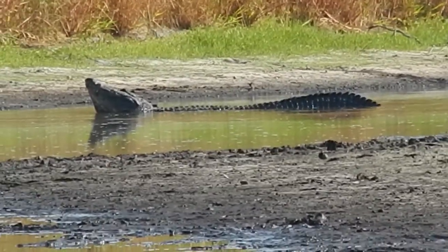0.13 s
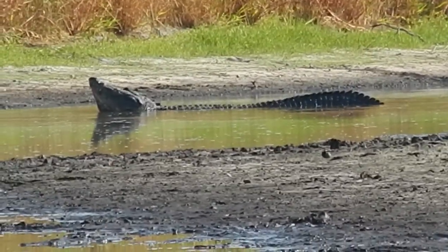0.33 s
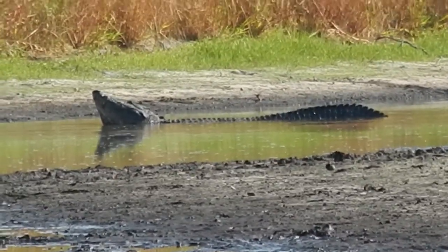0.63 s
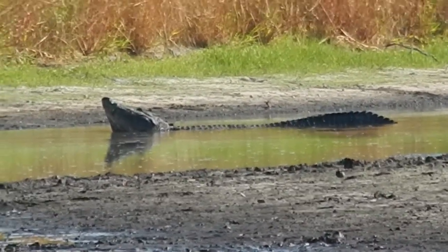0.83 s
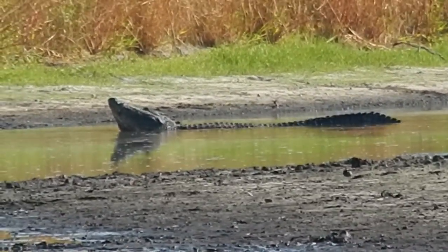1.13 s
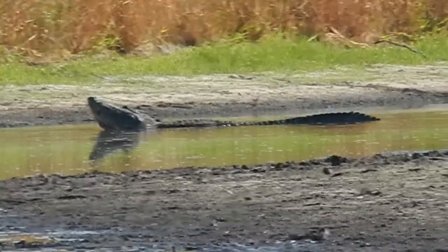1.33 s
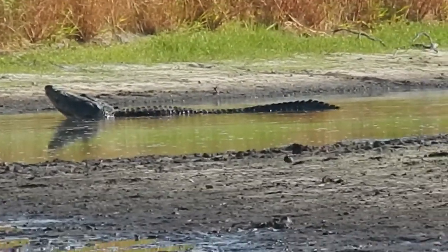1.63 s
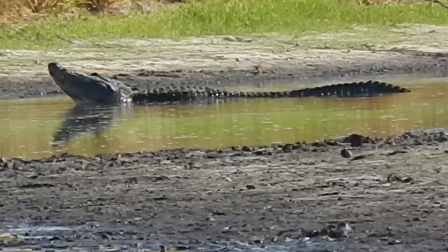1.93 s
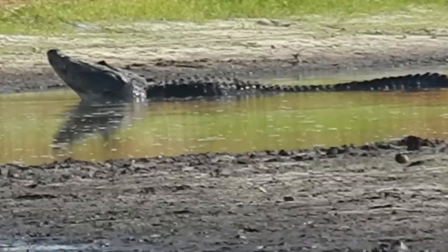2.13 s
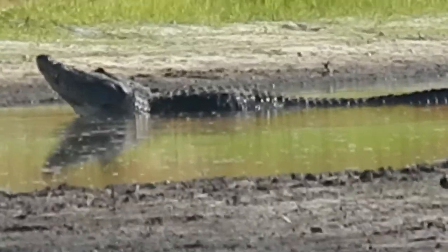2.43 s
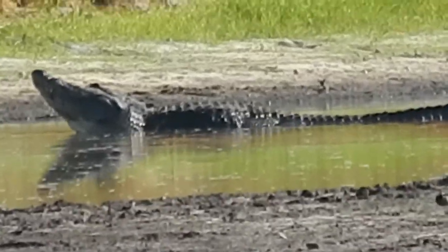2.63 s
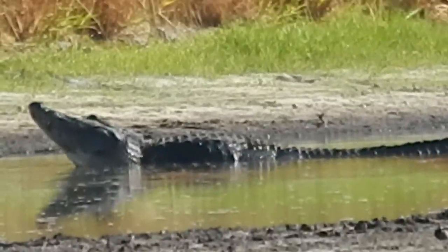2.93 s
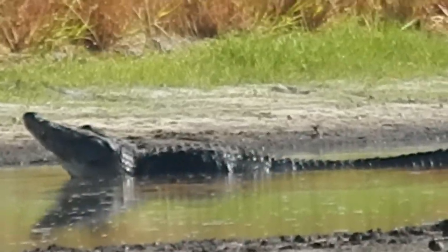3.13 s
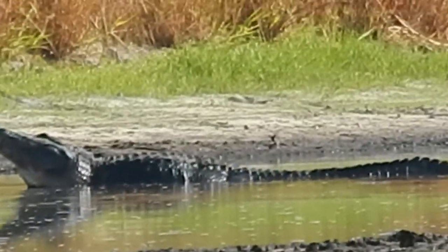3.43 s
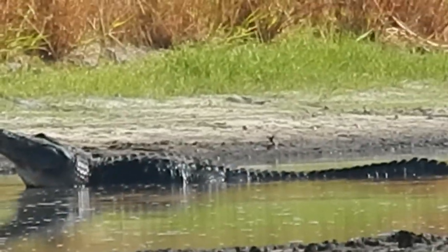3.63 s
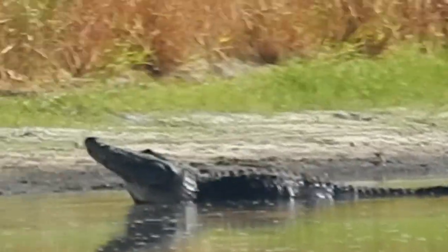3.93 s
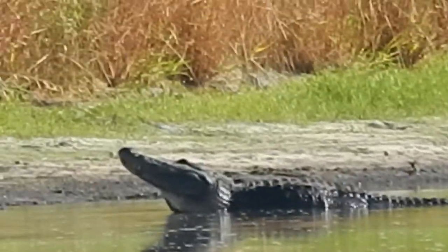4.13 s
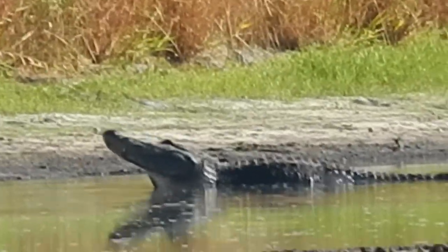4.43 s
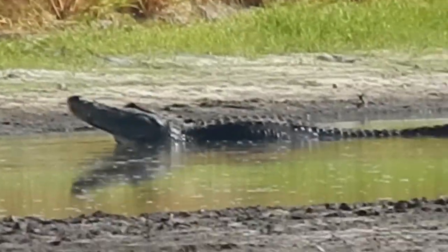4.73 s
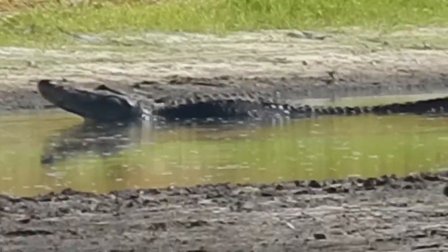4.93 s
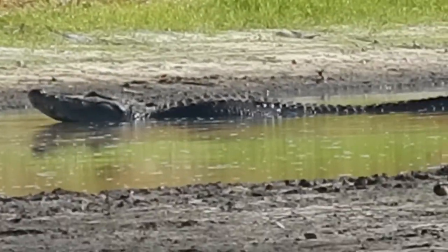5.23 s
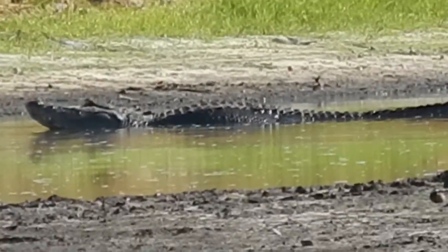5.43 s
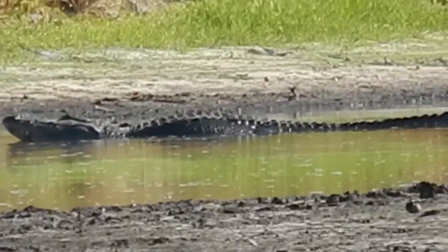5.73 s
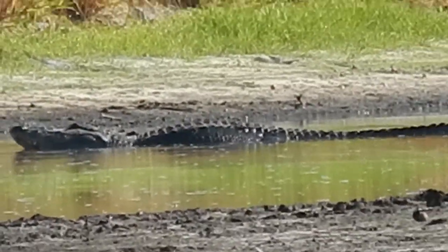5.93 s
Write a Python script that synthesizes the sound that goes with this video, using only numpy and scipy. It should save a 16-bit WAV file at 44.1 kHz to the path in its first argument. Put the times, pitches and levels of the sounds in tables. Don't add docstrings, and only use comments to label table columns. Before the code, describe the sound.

A distant alligator's deep bellow is already under way at 0 s, about thirty slow throat pulses per second, chesty and rough, pushing again near 0.9 s and dying by 1.5 s. Faint after-growls tick on until about 3.5 s. Wind rumble and soft handling jolts cover the first 1.5 s, then calm. From 1.4 to 1.8 s a marsh bird gives seven rapid hoarse chucks. At 2.2 s a sharp, dry button click snaps close, towards the right, by far the loudest event. Soft whistles follow at 2.3-2.6 s, then scattered chucks, with short sliding whistles around 3.3, 3.5, 4.2 and 4.35 s. Buzzy notes come at 5.05-5.2 s, more chucks after, and a longer buzz at 5.9 s. Faint lens whirr from 2 to 3.9 s, small casing creaks, focus ticks, thin crickets and steady air persist quietly; a low far engine hums after 4.8 s.

```python
import sys
import numpy as np
from scipy import signal
from scipy.fft import rfft, irfft, next_fast_len
from scipy.io import wavfile
from scipy.ndimage import uniform_filter1d

SR = 44100
rng = np.random.default_rng(int(sys.argv[2]) if len(sys.argv) > 2 else 0)


def natural_amplitude(level_db):
    exponent = np.asarray(level_db, float) / 20
    return 10 ** exponent


def wav_out(sig):
    wavfile.write(sys.argv[1], SR, np.round(np.clip(np.atleast_2d(sig).T, -1, 1) * 32767).astype(np.int16))


N = 267598

# (time [s], level [dB])
EFFORT = [
    (0.0, -38),
    (0.34, -38.5),
    (0.5, -41),
    (0.9, -37.5),
    (1.18, -43.5),
    (1.27, -43.5),
    (1.5, -71),
]
# (frequency [Hz], width [Hz], level [dB])
CHEST = [(88.3, 69.6, -4), (118, 50.6, 3), (165.3, 51.2, 1), (275.2, 81.8, -5.5), (311.3, 129, -12)]
# (time [s], length [s], level [dB])
GROWLS = [
    (1.6, .38, -49.5),
    (2.003, 0.177, -54),
    (2.361, 0.623, -51),
    (2.995, .5, -50.5),
]
PULSES_PER_S, SLOWING_PER_S2, FIRST_TURN = 33.5, 10.3, -.8
BELLOW_END_S, AFTER_PER_S = 1.4, 31.5
STRONG_WEAK_DB, BREATH = -2.5, 8.5
GROWL_FADE_DB = 6

CRICKETS_DB = -67.5

# (frequency [Hz], density [dB per Hz])
AIR = [(35, -49), (60, 3), (98, -4), (227, -12.5), (621, -21.5), (1090, -20.5), (2470, -29), (4640, -32.5),
       (6300, -36.5), (8920, -34.5), (11500, -37), (14200, -39), (16000, -45)]
# (frequency [Hz], correlation [-1 to 1])
LIKENESS = [(60, 1), (150, 0.882), (380, 0.458), (950, 0.312), (2380, 0.168), (5980, -0.77), (15000, -0.18)]
AIR_DB, BREEZE_DB = -49.5, .6
# (frequency [Hz], density [dB per Hz])
RUMBLE_COLOUR = [(12, -25.5), (25, 3.5), (45, 2.5), (65, -2), (100, -4), (150, -6), (210, -29),
                 (400, -67.5)]
# (time of peak [s], level [dB], time to rise 10 dB [s], time to fall 10 dB [s])
GUSTS = [
    (.16, -35, 0.39, 0.0639),
    (.55, -35, 0.09, 0.1765),
    (1.0, -36.5, 0.09, 0.13),
    (2.05, -41.5, 0.43, 0.1031),
    (2.53, -48.5, 0.57, 0.04),
    (2.95, -48.5, 0.22, 0.87),
    (4.05, -49, .5, .5),
    (5.22, -50, 0.52, 0.01),
    (5.64, -49, .1, 0.53),
]
CALM_DB, CALMING_DB_PER_S = -48, 2.5

# (time [s], peak level [dB], frequency [Hz], 60 dB decay [s])
THUMPS = [
    (0.124, -28.5, 37.7, 0.028),
    (0.527, -32.5, 52.7, 0.15),
    (0.982, -34.5, 42.4, 0.075),
    (1.424, -38, 64, 0.056),
]
# (time [s], peak level [dB], left over right [dB])
CREAKS = [
    (0.4482, -35, -13.5),
    (0.9799, -42.5, -12),
    (1.7515, -41.5, 11.5),
    (2.1921, -33.5, -8),
    (3.955, -42.5, -19),
    (4.9248, -42.5, 1.5),
    (4.97, -53.5, 7),
    (5.2634, -40.5, -8.5),
    (5.315, -43, -8),
    (5.7275, -43.5, -22),
]
CREAK_HZ = 3390
# (time [s], peak level [dB])
FOCUS = [(0.4484, -60), (1.1633, -46.5), (1.7519, -46.5), (2.0183, -45.5), (2.2209, -57.5), (2.5361, -40),
         (2.8664, -56), (3.0884, -54.5), (3.7798, -55), (4.1121, -44), (4.3685, -39.5), (5.2126, -43.5),
         (5.5507, -41.5), (5.886, -45)]

# (time [s], length [s], frequency [Hz], level [dB])
FAR_NOTES = [(.622, .025, 1050, -55), (.675, .025, 1150, -56), (.76, .03, 3900, -61), (.975, .02, 500, -53),
             (1.22, .03, 3900, -61), (1.35, .035, 3900, -60), (3.955, .07, 1850, -57),
             (3.965, .025, 430, -47), (4.0, .06, 2550, -60), (4.03, .03, 830, -56), (4.04, .05, 1950, -55),
             (4.26, .08, 1830, -58), (4.27, .05, 3060, -58), (5.06, .03, 3500, -57)]
# (time [s], peak level [dB], length [s], top above 7 kHz [dB])
CHUCKS = [(1.431, -44.5, 0.022, -3.5), (1.488, -39.5, 0.0275, -10), (1.543, -41, 0.0292, -8.5),
          (1.596, -38, 0.0265, -10.5), (1.648, -39.5, 0.0274, -8), (1.703, -41, 0.0198, -12.5),
          (1.759, -43, 0.0173, -16.5), (2.664, -40, 0.0318, -12), (3.21, -48.5, 0.0207, -28),
          (3.256, -38, 0.0325, -18), (3.306, -46, 0.04, -20), (3.608, -41.5, 0.0318, -23),
          (3.682, -47, 0.019, -9), (4.096, -45.5, 0.0143, -24), (4.142, -38, 0.0338, -16),
          (4.19, -46, 0.0484, -7), (4.471, -38.5, 0.0318, -16), (4.517, -50, 0.0346, -21.5),
          (4.953, -45, 0.0119, 0), (5.0, -37, 0.0267, -15), (5.251, -39, 0.0346, -12),
          (5.307, -40.5, 0.028, -6.5), (5.361, -41.5, 0.0283, -27), (5.478, -47, 0.0176, -18.5),
          (5.776, -50.5, 0.0225, -24), (5.837, -40, 0.0307, -16.5), (6.037, -39.5, 0.0377, -15)]
# (frequency [Hz], width [Hz], level [dB])
CHUCK_THROAT = [(1011, 263, -0.5), (1285.7, 158, 5), (1551, 41.4, 3.5), (1914, 133.7, 2), (2674, 310, -6.5),
                (4000, 340, -6.5)]
# (frequency [Hz], width [Hz], level [dB])
CHUCK_TOP = [(8300, 1400, 0), (9600, 1400, -1), (10900, 1300, -3)]
CHUCK_BEAK_HZ, CHUCK_BEAK_SPREAD = 1220, .08
LEFT_LAG = 4
MARSH_DB = -13

# (time [s], length [s], level [dB])
LENS_RUNS = [
    (2.036, .17, -66.5),
    (2.3, 1.58, -63.5),
]
# (frequency [Hz], width [Hz], level [dB])
LENS_BODY = [(11300, 1000, 0), (12200, 700, -5), (13300, 900, -3), (14300, 1100, -3), (15300, 1000, -4)]
LENS_STEPS_PER_S, LENS_SLOWING_PER_S2 = 58.9, 1.6
# (time [s], left level [dB], right level [dB], sharpness [Hz])
BUTTON = [
    (2.2211, -11, -7.5, 1800),
    (2.2229, -13.5, -4.5, 12000),
    (2.2236, -17, -14, 4500),
    (2.2249, -21, -43, 2500),
    (2.2258, -24, -9, 1500),
    (2.234, -57.5, -57.5, 2000),
]
# (frequency [Hz], level [dB], 60 dB decay [s])
CASING = [
    [(146.5, -13, 0.024), (800, -22.5, 0.0025), (1300, -2, 0.0154), (1559, 3.5, 0.0081), (1940, -9, 0.0101),
     (2796, 0, 0.0096), (5060, -7, 0.0072), (6950, -11.5, 0.0026), (12090, -14.5, 0.0089)],
    [(140, -17.5, 0.0197), (783, -12, 0.00303), (1565, -12.5, 0.0135), (2000, -16.5, 0.0156),
     (2619, 0, 0.01025), (3366, -7.5, 0.00644), (4640, -12, 0.00645), (7775, -12.5, 0.00337),
     (11330, -7.5, 0.0032)],
]

# (time [s], length [s], first pitch [Hz], last pitch [Hz], level [dB])
SOFT_NOTES = [
    (2.282, 0.0425, 1159, 1213, -48.5),
    (2.347, 0.0682, 1212, 1214, -47.5),
    (2.41, 0.1342, 1112, 1097, -42),
    (2.57, .05, 1077, 1039, -42),
]
# (time [s], length [s], first pitch [Hz], last pitch [Hz], level [dB])
HIGH_NOTES = [
    (3.31, .195, 1283, 1184, -46),
    (4.195, 0.1582, 1251, 1174, -46.5),
]
# (time [s], length [s], first pitch [Hz], last pitch [Hz], level [dB])
LOW_NOTES = [
    (3.502, 0.0588, 1110, 1057, -39),
    (4.351, 0.0562, 1093, 1053, -38.5),
]
# (frequency [Hz], level [dB])
WHISTLE_THROAT = [(1150, 0.5), (2300, -11.5), (3300, -10), (3750, -2), (4400, -19.5), (6200, -8),
                  (7600, -22), (10300, -22.5)]
# (frequency [Hz], width [Hz], level [dB])
NOTCHES = [(1233.5, 12.1, -7), (2475.7, 33, -17.5)]
WAVER_DB = 1.3

# (time [s], length [s], level [dB], beak resonance [Hz], hoarseness [0-1])
UNDER_NOTES = [
    (2.46, .09, -45, 1820, 0.41),
    (2.575, 0.0777, -45, 1856, 0.32),
    (3.53, .07, -45, 1364, 0.56),
    (4.39, 0.0689, -43.5, 1420, 0.49),
]
# (time [s], length [s], level [dB], beak resonance reached [Hz], hoarseness [0-1])
BUZZ_NOTES = [
    (5.05, .082, -41, 1320, .2),
    (5.144, .048, -42.5, 1300, 0.32),
    (5.201, .029, -43, 1290, 0.27),
]
# (time [s], length [s], level [dB], beak resonance reached [Hz], hoarseness [0-1])
LONG_BUZZ = [
    (5.89, .152, -44, 1225, .11),
]
# (frequency [Hz], level [dB])
BUZZ_THROAT = [(600, -51), (900, -10), (1300, -11), (2000, -9), (2400, -14.5), (3700, -10), (5000, -12),
               (7000, -19), (9000, -22), (11500, -31)]
BEAT_HZ, LONG_BEAT_HZ, BEAT_SAG_HZ_PER_S = 185, 189, 230
BEAK_SHUT_HZ, BEAK_WIDTH_HZ = 1145, 150

# (time [s], firing rate [Hz], level [dB])
DRONE = [(4.8, 76.78, -55), (5.106, 77, -45), (5.162, 84.6, -45.5), (5.342, 83.7, -43), (5.374, 84.14, -60),
         (5.4, 86.25, -45.5), (5.8, 87.03, -49.5), (6.068, 88.17, -52.5)]


def in_time(rows, fade=0.0013):
    t = np.arange(N) / SR
    s, *columns = np.transpose(rows)
    gate = np.clip(np.minimum(t - s[0], s[-1] - t) / fade, 0, 1)
    return [np.interp(t, s, c) for c in columns] + [gate]


def held(s, length, attack_s, release_s):
    t = np.arange(N) / SR - s
    return np.clip(np.minimum(t / attack_s, (length - t) / release_s), 0, 1)


def rms_one(x):
    return x / np.sqrt(np.mean(x ** 2) + 1e-20)


def at_hz(points, hz):
    known_hz, value = np.transpose(points)
    return np.interp(np.log(hz + 1e-9), np.log(known_hz + 1e-9), value)


def drift(hz):
    lowpass = signal.butter(2, hz * 20, fs=SR, output="sos")
    slow = signal.sosfilt(lowpass, rng.standard_normal(N // 20 + 4002))[4000:]
    return np.interp(np.arange(N) / 20, np.arange(len(slow)), rms_one(slow))


def resonate(x, modes):
    out = 0
    for k, (hz, width_hz, db) in enumerate(modes):
        r = np.exp(-np.pi * width_hz / SR)
        zeros = np.array([1, 0, -1]) * (1 - r * r) / 2
        poles = [1, -2 * r * np.cos(2 * np.pi * hz / SR), r * r]
        out = out + (-1) ** k * natural_amplitude(db) * signal.lfilter(zeros, poles, x + 1e-18)
    return out


def beats(turns):
    return np.diff(np.floor(turns), prepend=np.floor(turns[0]))


def placed(x, pan_db):
    return np.array([np.roll(x, LEFT_LAG) * natural_amplitude(pan_db / 2), x * natural_amplitude(-pan_db / 2)])


def stereo_noise(spectrum, likeness):
    size = next_fast_len(N)
    hz = np.fft.rfftfreq(size, 1 / SR)
    shared, left, right = rfft(rng.standard_normal((3, size))) * natural_amplitude(at_hz(spectrum, hz))
    alike = np.clip(likeness(hz), 0, 1)
    late = np.exp(-2j * np.pi * hz * LEFT_LAG / SR)
    common = np.sqrt(alike) * shared * np.array([late, late ** 0])
    pair = common + np.sqrt(1 - alike) * np.array([left, right])
    return rms_one(irfft(pair, size)[:, :N])


def bellow():
    t = np.arange(N) / SR
    per_s = np.where(t < BELLOW_END_S, PULSES_PER_S - SLOWING_PER_S2 * t, AFTER_PER_S)
    turns = FIRST_TURN + np.cumsum(per_s) / SR
    clicks = beats(np.maximum.accumulate(turns + 0.0372 * drift(30.57)))
    at = np.flatnonzero(clicks)
    clicks[at] = natural_amplitude(STRONG_WEAK_DB * (-1) ** np.arange(len(at)) + 1.95 * rng.standard_normal(len(at)))
    airflow = uniform_filter1d(clicks, size=700, origin=300) + 0.00058
    breath = airflow * rng.standard_normal(N) * BREATH
    dull = signal.butter(3, 350, fs=SR, output="sos")
    voice = signal.sosfilt(dull, resonate(clicks + breath, CHEST))
    evened = voice / np.sqrt(uniform_filter1d(voice ** 2, size=9000) + 1e-12)
    db, gate = in_time(EFFORT)
    after = sum(natural_amplitude(db - GROWL_FADE_DB * (t - s) / length) * held(s, length, .04, 0.089)
                for s, length, db in GROWLS)
    return evened * natural_amplitude(-3.5) * (natural_amplitude(db) * gate + after)


def crickets():
    out = 0
    for hz, pan_db, level_db in ((5676, 14, -1.5), (5425, -20.5, -11)):
        stroke = np.sin(2 * np.pi * np.cumsum(78 * (1 + 0.02086 * drift(3.01))) / SR)
        pulse = 0.575 + np.maximum(stroke, 0) ** 2
        wing = [(hz, 360, 0)]
        trill = rms_one(resonate(resonate(pulse * rng.standard_normal(N), wing), wing))
        out = out + placed(trill * natural_amplitude(level_db + 2.74 * drift(3.2)), pan_db)
    return out * natural_amplitude(CRICKETS_DB)


def air():
    level = natural_amplitude(AIR_DB + 0.5 + BREEZE_DB * drift(1.22))
    return level * stereo_noise(AIR, lambda hz: at_hz(LIKENESS, hz)) * natural_amplitude([[.7], [-.7]])


def wind():
    t = np.arange(N) / SR
    gusts = sum(natural_amplitude(db - 10 * np.maximum((s - t) / rise, (t - s) / fall)) for s, db, rise, fall in GUSTS)
    level = (gusts + natural_amplitude(CALM_DB - CALMING_DB_PER_S * t)) * natural_amplitude(-4 + 2.22 * drift(6.78))
    return level * stereo_noise(RUMBLE_COLOUR, lambda hz: hz / 110) * natural_amplitude([[2.5], [-2.5]])


def thumps():
    t = np.arange(N) / SR
    return sum(natural_amplitude(db - 60 * np.abs(t - s - .025) / t60) * np.sin(2 * np.pi * hz * (t - s))
               for s, db, hz, t60 in THUMPS)


def creaks():
    out, size = np.zeros((2, N)), 400
    band = signal.butter(1, [CREAK_HZ / 5, CREAK_HZ * 2], "band", fs=SR, output="sos")
    for s, db, pan_db in CREAKS:
        burst = rng.standard_normal(size) * np.exp(-np.arange(size) / SR / 0.00605)
        burst = signal.sosfilt(band, burst)
        i = round(s * SR)
        out[:, i:i + size] += burst * natural_amplitude(db - 8 + pan_db * np.array([[.5], [-.5]]))
    return out


def focus():
    t = np.arange(N) / SR
    shape = sum(natural_amplitude(db - 15) * np.exp(-((t - s - .01) / 0.0041) ** 2) for s, db in FOCUS)
    return shape * rms_one(resonate(rng.standard_normal((2, N)), [(13930, 530, 0)]))


def far_notes():
    t, shimmer = np.arange(N) / SR, 1 + 0.85 * drift(260)
    tones = 0
    for s, length, hz, db in FAR_NOTES:
        swell = np.sin(np.pi * np.clip((t - s) / length, 0, 1))
        tones = tones + natural_amplitude(db) * swell * np.sin(2 * np.pi * hz * t)
    return shimmer * tones


def chucks():
    size = 2000
    chance = rng.standard_normal((len(CHUCKS), 3, size))
    out, t = np.zeros(N + size), np.arange(size) / SR
    for (s, db, length, top_db), (wobble, breath, hiss) in zip(CHUCKS, chance):
        beak_hz = CHUCK_BEAK_HZ * np.exp(CHUCK_BEAK_SPREAD * wobble[1])
        shape = np.clip(np.minimum(t / 0.00049, (length - t) / 0.01357), 0, 1)
        beat_hz = 265 * (1 + .03 * wobble[0] + 0.627 * uniform_filter1d(wobble, size=200))
        source = 7.04 * beats(0.704 + np.cumsum(beat_hz) / SR) + 0.373 * breath
        voiced = resonate(source, CHUCK_THROAT) + resonate(source, [(beak_hz, 150, 3)])
        top = rms_one(resonate(hiss, CHUCK_TOP)) * natural_amplitude(db + top_db - 10.5)
        i = round(s * SR)
        out[i:i + size] += shape * (rms_one(voiced) * natural_amplitude(db - 8.5) + top)
    return out[:N]


def marsh(x):
    t = np.arange(5000) / SR
    scatter = rng.standard_normal((2, 5000)) * natural_amplitude(-60 * t / .15) * (t > .004)
    scatter = scatter / np.sqrt((scatter ** 2).sum(1, keepdims=True))
    dulled = signal.lfilter([.5], [1, -.5], x)
    return natural_amplitude(MARSH_DB) * signal.fftconvolve(dulled[None], scatter)[:, :N]


def lens():
    per_s = LENS_STEPS_PER_S - LENS_SLOWING_PER_S2 * np.arange(N) / SR
    puffs = signal.lfilter([1], [1, -.985], beats(np.cumsum(per_s) / SR)) + 0.204
    pair = resonate(puffs * rng.standard_normal((2, N)), LENS_BODY)
    runs = sum(natural_amplitude(db) * held(s, length, 0.072, .018) for s, length, db in LENS_RUNS)
    return rms_one(pair) * natural_amplitude(0.99 * drift(3.3)) * runs


def button():
    start, size = round(BUTTON[0][0] * SR), 3000
    out, clicks = np.zeros((2, N)), np.zeros((2, size))
    for n, (s, left_db, right_db, hz) in enumerate(BUTTON):
        soft = np.exp(-2 * np.pi * hz / SR)
        contact = (1 - soft) * soft ** np.arange(60)
        i = max(round(s * SR) - start, 0)
        clicks[:, i:i + 60] += (-1) ** n * natural_amplitude([[left_db], [right_db]]) * contact
    for port, modes in enumerate(CASING):
        for k, (hz, db, t60) in enumerate(modes):
            r, w = natural_amplitude(-60 / (t60 * SR)), 2 * np.pi * hz / SR
            ring = signal.lfilter([0, np.sin(w)], [1, -2 * r * np.cos(w), r * r], clicks[port])
            out[port, start:start + size] += (-1) ** k * natural_amplitude(db) * ring
    return out


def whistles(notes, bend, fade_db_per_s, dull_db):
    out, quaver = np.zeros(N), 1 + 0.00384 * drift(62)
    shimmer, k = drift(43), np.arange(1, 9)[:, None]
    for s, length, first_hz, last_hz, db in notes:
        gate = held(s, length, 0.00553, 0.0047)
        span = np.flatnonzero(gate)
        t = np.arange(len(span)) / SR
        hz = first_hz + (last_hz - first_hz) * (t / length) ** bend
        notch = sum(dip_db * np.exp(-((k * hz - at) / width) ** 2) for at, width, dip_db in NOTCHES)
        waver = WAVER_DB * np.sqrt(k * k - .5) ** 0.643 * shimmer[span - 5000 * k]
        dulling = dull_db * (k > 2) * np.where(k * hz > 8200, .3, 1)
        levels = db - fade_db_per_s * t + at_hz(WHISTLE_THROAT, k * hz) + notch - dulling + waver
        phase = 2 * np.pi * np.cumsum(hz * quaver[span]) / SR
        partials = natural_amplitude(levels) * np.sin(k * phase + k * k)
        out[span] += gate[span] * np.sqrt(2) * partials.sum(0)
    return out


def buzz_course(notes, beat_hz, peak_at, swell_db, fade_db, roughening, opens):
    courses = []
    for s, length, db, hz, hoarse in notes:
        first_hz = BEAK_SHUT_HZ if opens else hz
        sagged_hz = beat_hz - BEAT_SAG_HZ_PER_S * .28 * length
        courses.append([
            (s, beat_hz, db - swell_db, first_hz, hoarse),
            (s + peak_at * length, beat_hz, db, first_hz, hoarse),
            (s + .6 * length, beat_hz, db - fade_db / 3, hz, hoarse + roughening / 8),
            (s + .72 * length, beat_hz, db - fade_db / 3, hz * 1.04, hoarse + roughening),
            (s + length, sagged_hz, db - fade_db, hz, hoarse + roughening)])
    return courses


def buzzes(courses, beak_db, width_hz):
    out = np.zeros(N)
    for rows in courses:
        *columns, gate = in_time(rows, fade=0.0015)
        span = gate > 0
        hz, db, beak, hoarse = [c[span] for c in columns]
        phase, k = 2 * np.pi * np.cumsum(hz) / SR, np.arange(4, 62)[:, None]
        flutter = uniform_filter1d(rng.standard_normal((2, len(k), len(hz))), size=180) * np.sqrt(180)
        smear = (flutter[0] + 1j * flutter[1]) / np.sqrt(2)
        share = np.clip(hoarse * (.5 + k / 14), 0, 1)
        formant = beak_db / (1 + ((k * hz - beak) / width_hz) ** 2)
        weight = natural_amplitude(at_hz(BUZZ_THROAT, k * hz) + formant)
        carrier = np.exp(1j * (k * phase + rng.uniform(0, 2 * np.pi, k.shape) * (k > 8)))
        stack = weight * np.real(carrier * (1 - share + share * smear))
        even = stack.sum(0) / np.sqrt((weight ** 2).sum(0) / 2)
        out[span] = even * natural_amplitude(db + 2.02) * gate[span]
    return out


def drone():
    hz, db, gate = in_time(DRONE, fade=0.034)
    return np.sqrt(2) * natural_amplitude(db) * gate * np.sin(2 * np.pi * np.cumsum(hz) / SR)


def scene():
    clear = (whistles(SOFT_NOTES, bend=1.096, fade_db_per_s=75, dull_db=10.5)
             + whistles(HIGH_NOTES, bend=2.8, fade_db_per_s=-4, dull_db=0.0)
             + whistles(LOW_NOTES, bend=0.935, fade_db_per_s=130, dull_db=5.5))
    rough = (buzz_course(BUZZ_NOTES, BEAT_HZ, peak_at=0.258, swell_db=1.5, fade_db=8, roughening=.2, opens=True)
             + buzz_course(LONG_BUZZ, LONG_BEAT_HZ, peak_at=.1, swell_db=2.0, fade_db=10.5,
                           roughening=.4, opens=True))
    under = buzz_course(UNDER_NOTES, BEAT_HZ, peak_at=.52, swell_db=8, fade_db=6.5, roughening=0.22, opens=False)
    buzzing = (buzzes(rough, beak_db=19.5, width_hz=BEAK_WIDTH_HZ)
               + buzzes(under, beak_db=10.5, width_hz=505))
    bird = clear + buzzing + chucks()
    distant = placed(bellow() + drone() + far_notes(), 1.35)
    pond = placed(bird, 0.54) + marsh(bird) + distant + crickets()
    camera = thumps() * natural_amplitude([[3], [-4]]) + lens() + focus() + creaks() + button()
    return pond + air() + wind() + camera


def roll_off(x):
    return signal.sosfilt(signal.butter(12, 15810, fs=SR, output="sos"), x)


def record(dry):
    bass_cut = signal.butter(2, 34, "high", fs=SR, output="sos")
    mix = signal.sosfilt(bass_cut, dry)
    return roll_off(mix)


dry = scene()
out = record(dry)
wav_out(out)
```